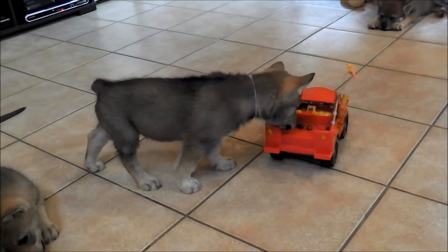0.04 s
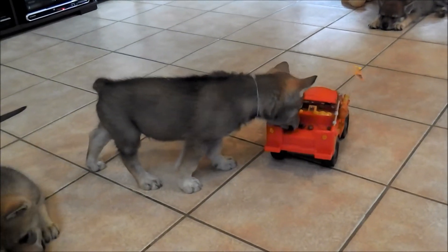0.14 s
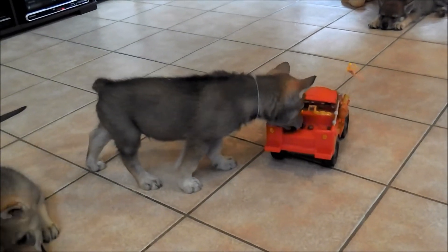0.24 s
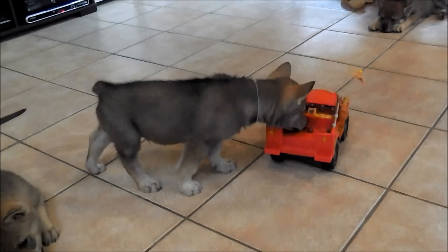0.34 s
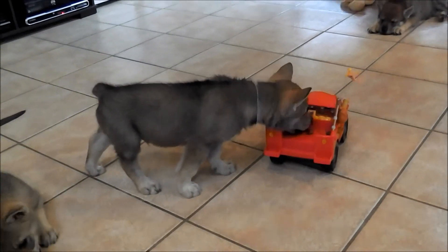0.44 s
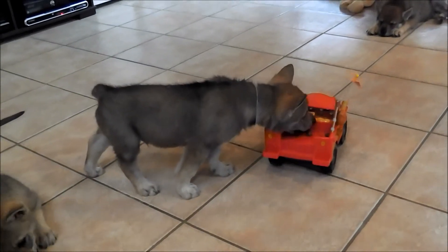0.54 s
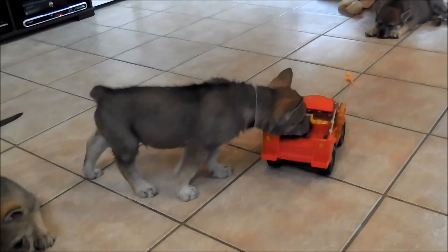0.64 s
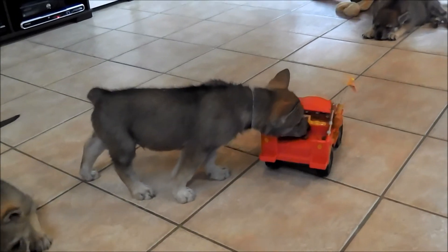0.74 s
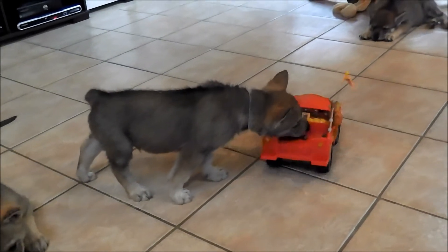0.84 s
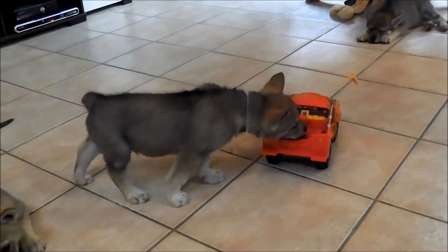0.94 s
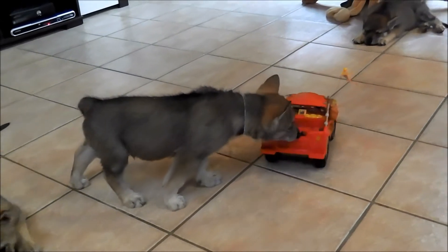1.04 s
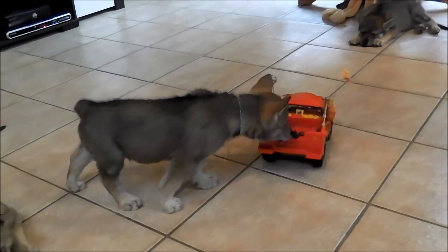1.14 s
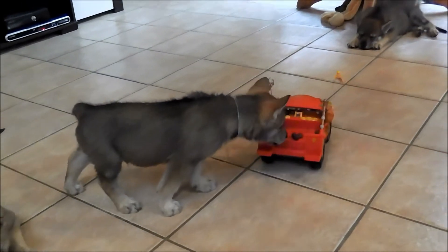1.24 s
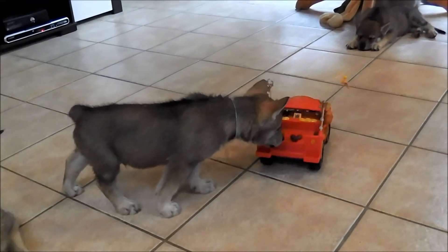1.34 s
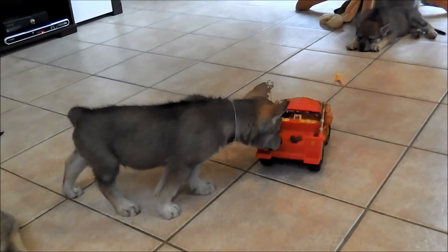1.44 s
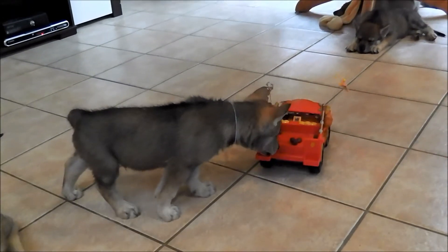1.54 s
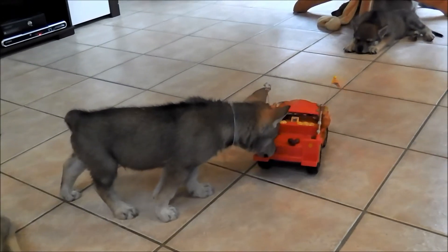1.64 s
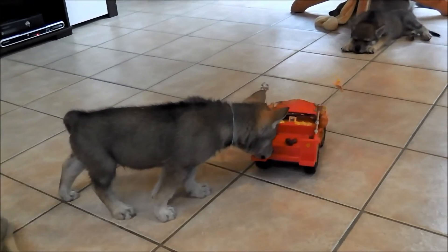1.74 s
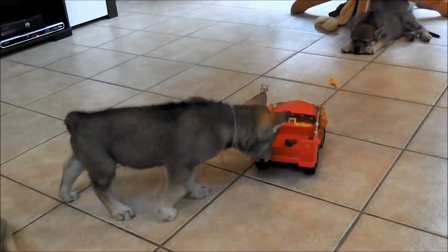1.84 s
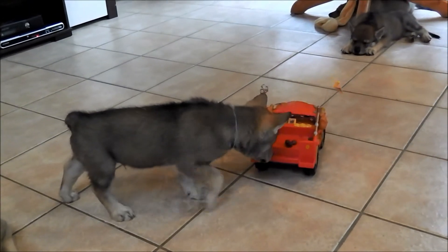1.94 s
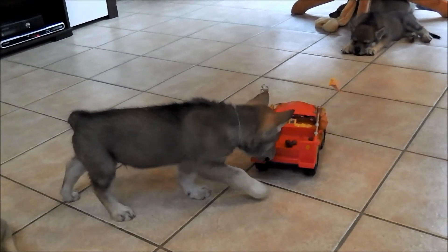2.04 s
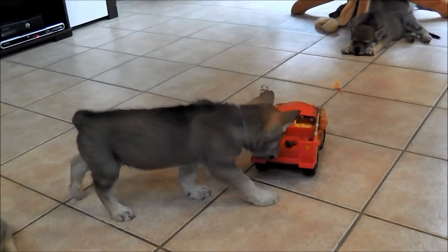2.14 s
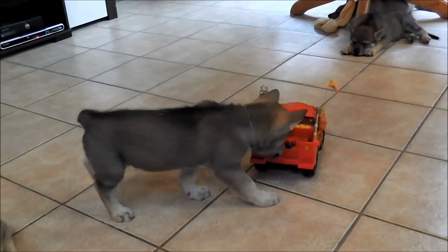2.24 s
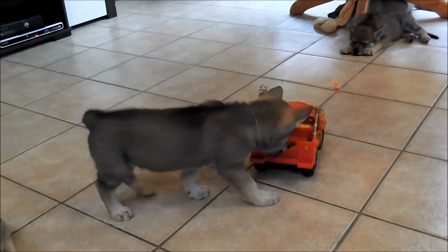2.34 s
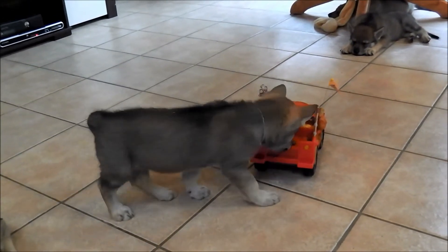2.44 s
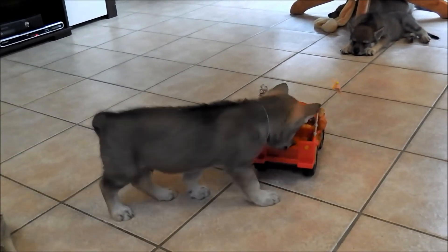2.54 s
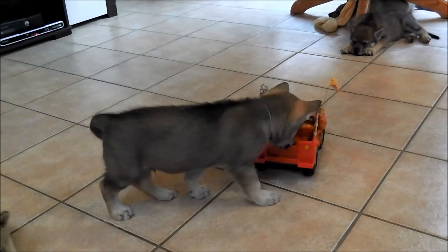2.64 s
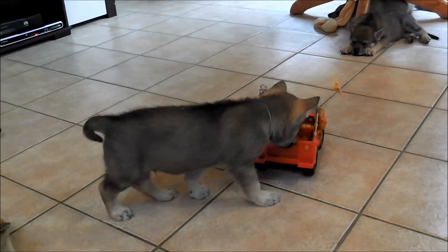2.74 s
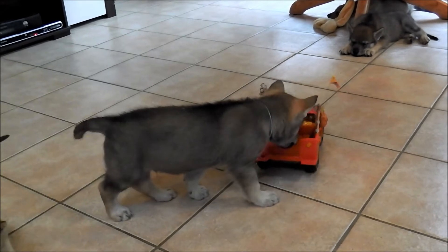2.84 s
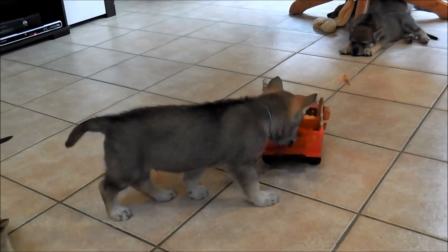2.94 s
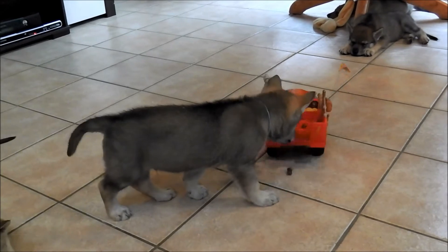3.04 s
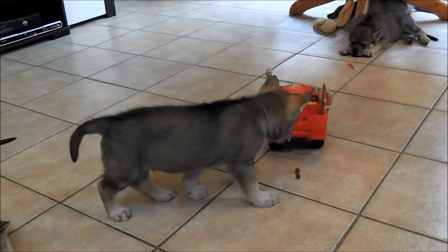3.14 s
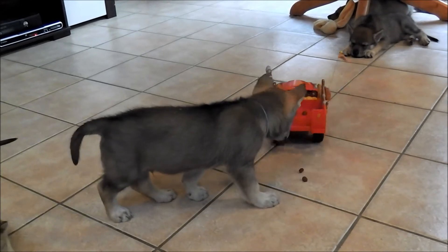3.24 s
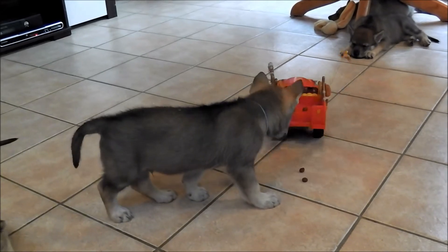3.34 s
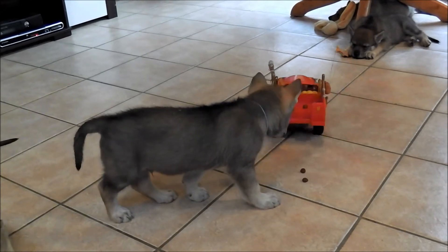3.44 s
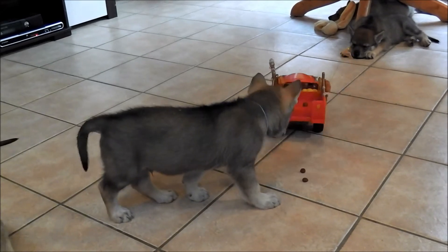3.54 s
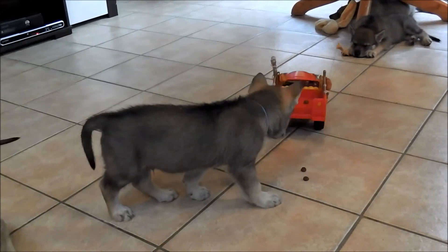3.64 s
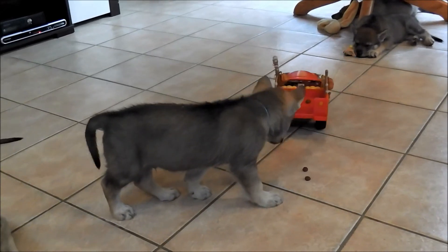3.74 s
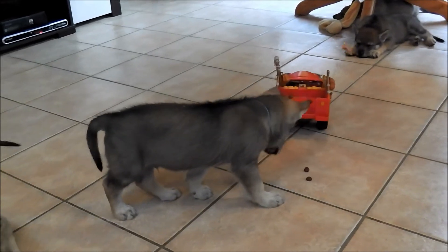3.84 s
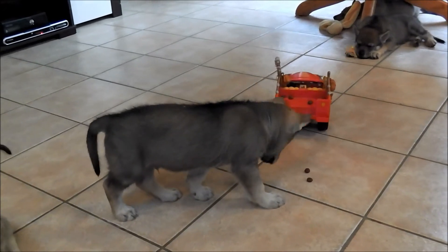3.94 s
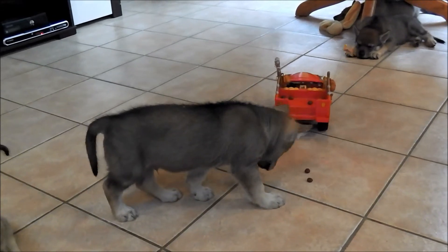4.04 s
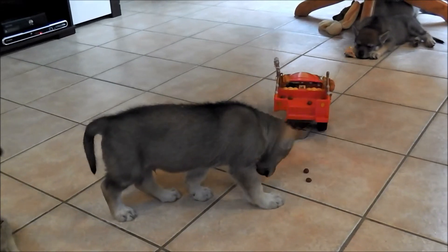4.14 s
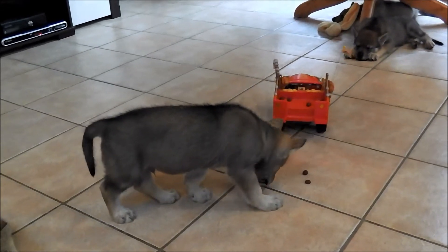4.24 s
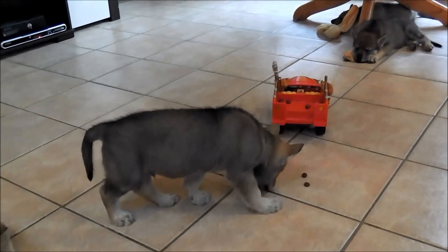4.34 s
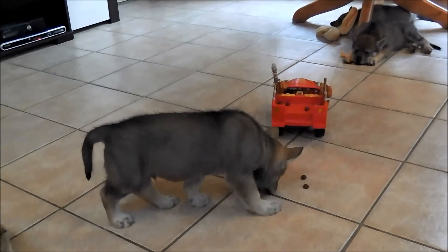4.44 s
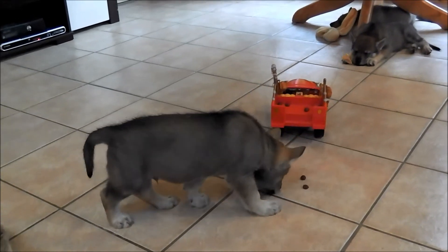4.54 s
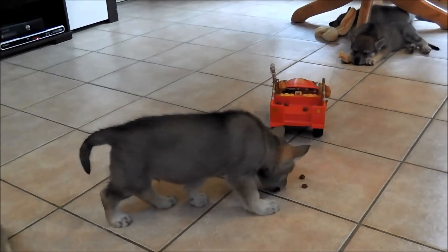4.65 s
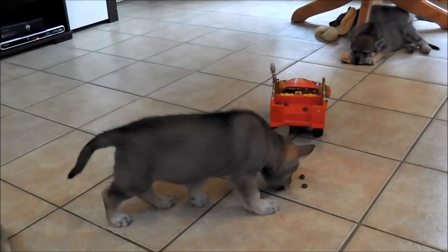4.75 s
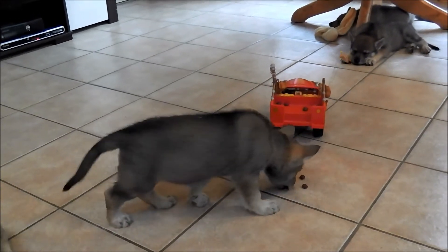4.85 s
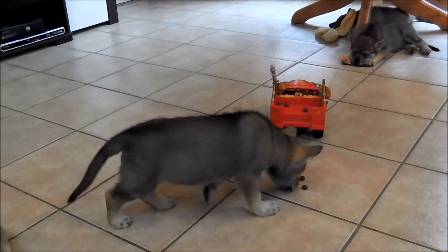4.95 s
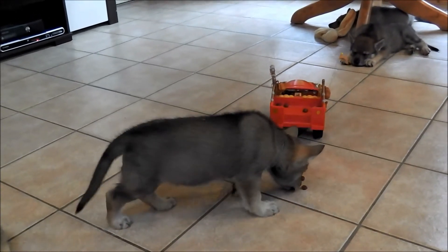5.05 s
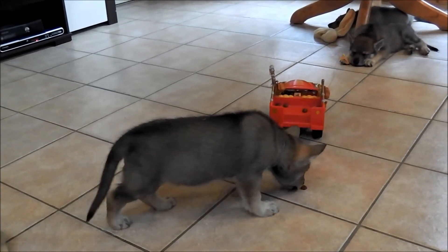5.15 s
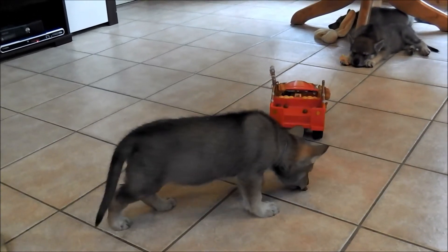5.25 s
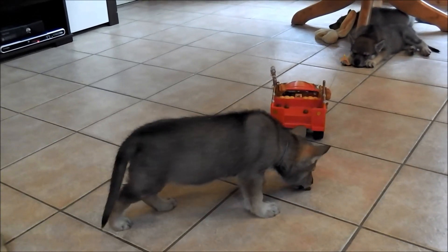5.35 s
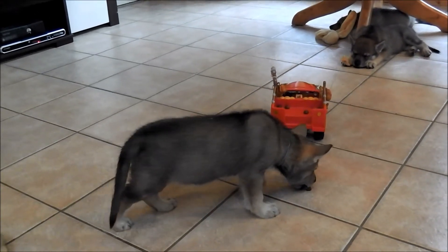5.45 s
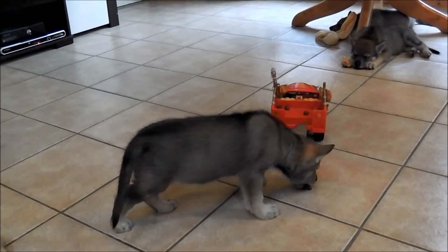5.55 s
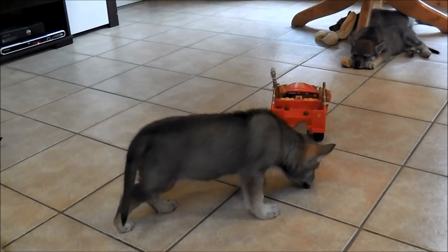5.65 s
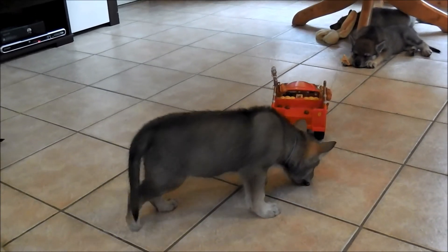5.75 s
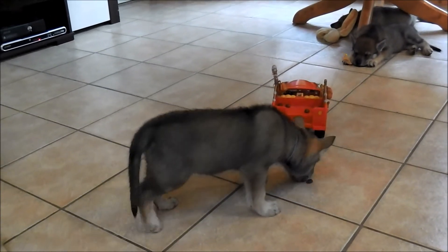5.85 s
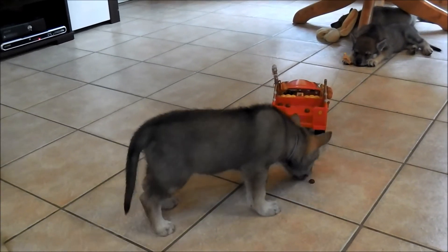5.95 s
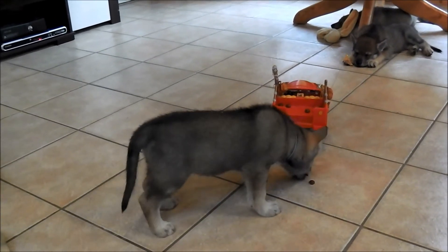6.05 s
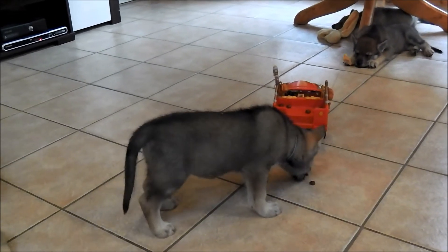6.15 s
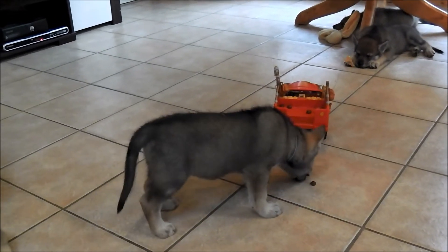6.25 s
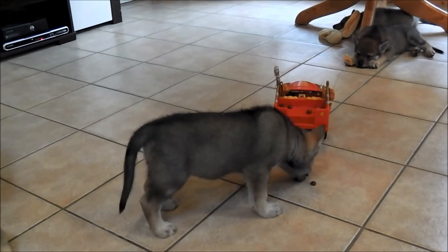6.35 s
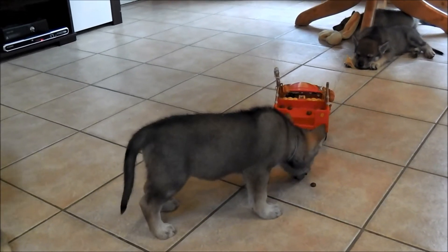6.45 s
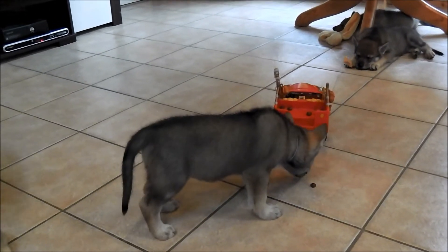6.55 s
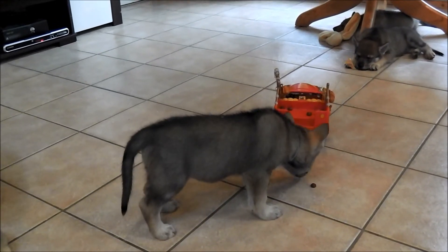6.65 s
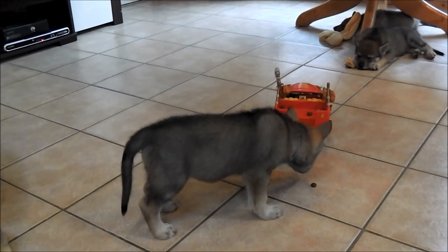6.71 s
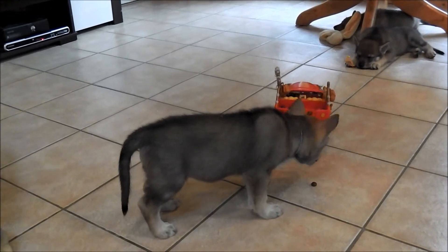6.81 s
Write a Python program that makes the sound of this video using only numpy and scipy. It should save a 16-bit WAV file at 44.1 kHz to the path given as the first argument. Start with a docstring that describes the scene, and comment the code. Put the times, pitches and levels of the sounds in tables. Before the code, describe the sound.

In a hard, lively indoor room, a soft steady hiss lies under everything. From 0 to 0.6 seconds, faint scuffling, light plastic taps and tiny creaks come from a hollow toy truck. A firmer knock at 0.6 leads into a short rattling roll over tiles from about 0.7 to 1.3, with the loudest sharp clack near 0.9 and another at 1.1. Sparse, softer knocks and a small treat crack follow until 2.5. A bright hollow knock at 2.6 starts a second, denser burst of wheel chatter and clacks from 2.7 to 3.3, coasting down into a faint low drone. Small creaks and cracks occur around 3.6 to 4.5. Dry crunches cluster near 5.0 to 5.4, then after a quieter gap return crisply from 6.0 to 6.9, strongest around 6.4 to 6.5, amid faint ticks.

```python
"""A puppy noses a hollow plastic toy truck over the tiles of a hard, fairly live room.
Knocks and creaks ring the truck's shell; twice it rolls off on chattering wheels and coasts to rest.
Treats crack between the puppy's teeth, mostly after the rolling, amid faint scuffling ticks.
Each source is a contact force driving damped resonances; noise echoes give the room.
A soft hiss, separate in the two channels, lies under it all."""
import sys
import numpy as np
from scipy import signal
from scipy.fft import rfft, irfft, next_fast_len
from scipy.io import wavfile

SR = 44100
rng = np.random.default_rng(int(sys.argv[2]) if len(sys.argv) > 2 else 0)


def transcribe(u):
    """Save the signal u as a 16-bit wav file named by the first command-line argument.

    u: samples, shape (n,) or (channels, n), limited to [-1, 1]; the rate is SR.
    q: integer samples, one column per channel.
    """
    v = np.clip(np.atleast_2d(u).T, -1, 1)
    q = np.round(v * 32767).astype(np.int16)
    wavfile.write(sys.argv[1], SR, q)


N = 303408

# Truck and puppy levels are set ahead of the common gain in scene(); the hiss is added after it.
# The low, middle, upper and top registers: from_hz, to_hz
REGISTERS = [(25, 950), (900, 2500), (2500, 6800), (6800, 15500)]
# Damped modes of the truck's body, the lowest a thud on the floor: mode_hz, width_hz, strength_db
BODY = [(40, 88, -11), (119, 79, -15), (395.7, 12.6, -2.5), (583, 127, 3), (717, 120, -10), (1090, 75, -1),
        (1410, 195, -1.5), (1593, 280, 0), (1950, 320, -0.5), (2240, 870, -6.5), (2510, 1350, 7.5),
        (3040, 520, -1), (3860, 700, -5.5), (4570, 1030, 3), (5370, 780, 2), (6200, 770, -10),
        (8400, 3600, 10.5), (11000, 4600, -7)]
# Tones of the truck's small loose parts: tone_hz, width_hz, strength_db
PARTS = [(1423, 23, -3), (1843, 41, -6), (2100, 69, -1.5), (2558, 28, 1.5), (2635, 32, -2.5),
         (2950, 54, -3), (3350, 75, -4), (3890, 65, -4), (4796, 91, -0.5), (5740, 110, -2), (6760, 130, -1),
         (8350, 140, -2)]
CUTOFF_HZ = 15800  # top of the sound
SHOVE_ATTACK_S = 0.016
BRISK_DB = -34.5  # level of a brisk roll


def from_db(db):
    """Decibels to amplitude gain."""
    return 10 ** (np.asarray(db) / 20)


def rms_one(x):
    """Scale to rms 1."""
    return x / np.sqrt(np.mean(x ** 2) + 1e-30)


def at_hz(rows, hz):
    """Read each column of a spectrum at the given frequencies, on a logarithmic pitch axis."""
    row_hz, *columns = np.transpose(rows)
    log_hz = np.log(np.maximum(hz, 1))
    return [np.interp(log_hz, np.log(row_hz), column) for column in columns]


def band(x, edges):
    """Causal band-pass between two edges in Hz."""
    sos = signal.butter(2, edges, "band", fs=SR, output="sos")
    return signal.sosfilt(sos, x + 1e-18)


def resonance(x, hz, width):
    """One damped mode with gain 1 at its peak; the wider it is (Hz), the sooner it dies."""
    r = np.exp(-np.pi * width / SR)
    zeros = np.array([1, 0, -1]) * (1 - r * r) / 2
    poles = [1, -2 * r * np.cos(2 * np.pi * hz / SR), r * r]
    return signal.lfilter(zeros, poles, x + 1e-18)


def ringing(x, modes):
    """Sum of the modes that x sets ringing."""
    return sum(from_db(db) * resonance(x, hz, width) for hz, width, db in modes)


def coloured(x, spectrum, weight=1):
    """Give x a smooth spectrum; weights of opposite sign lean it to one side."""
    size = next_fast_len(N)
    db, = at_hz(spectrum, np.arange(size // 2 + 1) * SR / size)
    return irfft(rfft(x, size) * from_db(db * np.asarray(weight)), size)[..., :N]


def delayed(x, lag_s):
    """Delay by any time, even a fraction of a sample, by turning the phase of each frequency."""
    size = next_fast_len(N)
    hz = np.arange(size // 2 + 1) * SR / size
    return irfft(rfft(x, size) * np.exp(-2j * np.pi * hz * lag_s), size)[:N]


def surge(s, hold_s, db, fade_db_per_s, attack_s):
    """Power of one push: it swells, holds until hold_s after its start, then dies at a steady rate."""
    t = np.arange(N) / SR - s
    swell = np.clip(t / attack_s, 0, 1)
    faded_db = db - fade_db_per_s * np.maximum(t - hold_s, 0)
    return (swell * from_db(np.maximum(faded_db, -120))) ** 2


def register(force, modes, edges, spread_db=0):
    """The modes of one register answer a force; their strengths vary with the point of contact."""
    chance = rng.standard_normal(len(modes))
    answer = sum(from_db(db + spread_db * luck) * resonance(force, hz, width)
                 for (hz, width, db), luck in zip(modes, chance) if edges[0] <= hz < edges[1])
    return band(answer, edges)


def evened(force):
    """Give a contact force equal strength at every pitch, so that the struck object alone colours it."""
    return irfft(np.exp(1j * np.angle(rfft(force))), len(force))


def blows(table, modes, click, spread_db, fade, focus_db, thud_hz):
    """Each blow is a click and a short gritty slip, heard as a ring and a low thud."""
    grip_s = 0.00052  # time for the contact to build up
    slip_taper = 0.18  # share of the contact's release that also damps its last grit
    softest_db = 23.5  # softness (dB per octave) against which the low edge of a ring is set
    top_loss_db = 19.5  # a ring ends steeply where its softness has cost it this much
    t = np.arange(SR // 20) / SR
    out = np.zeros(N + len(t))
    hz, width, mode_db = np.transpose(modes)
    grip = 1 - np.exp(-t / grip_s)
    for s, db, spot_hz, soft_db, thud_db, contact_ms in table:
        release = np.exp(-fade * 1000 * t / contact_ms)
        slip = grip * release * rng.standard_normal(len(t))
        force = evened(click * (t == 0) + slip) * release ** slip_taper
        # modes near the pitch of the struck spot answer best; those above lose soft_db per octave
        octaves = np.log2(hz / spot_hz)
        loss_db = focus_db * np.minimum(abs(octaves), .5) + soft_db * np.maximum(octaves, 0)
        struck = list(zip(hz, width, mode_db - loss_db))
        ring = sum(register(force, struck, edges, spread_db) for edges in REGISTERS[1:])
        # a soft touch stirs little but its own spot, so the ring thins out on both sides of that pitch
        low_hz = spot_hz * np.clip(soft_db / softest_db, .1, .85)
        high_hz = min(spot_hz * 2 ** (top_loss_db / max(soft_db, 2)), CUTOFF_HZ)
        ring = signal.sosfilt(signal.butter(3, [low_hz, high_hz], "band", fs=SR, output="sos"), ring)
        thud = register(force, modes, (thud_hz, REGISTERS[0][1]), spread_db)
        blow = rms_one(ring) + from_db(thud_db) * rms_one(thud)
        at = max(round(s * SR), 0)
        # the root of 10 refers the level of the 50 ms ring to 5 ms
        out[at:at + len(t)] += from_db(db) * blow / np.sqrt(10)
    return out[:N]


def chatter(shares_db, level_db, per_s, uneven_db, reach):
    """Many tiny contacts each reach only some of the body's modes, so each has its own pitch."""
    lightest_hz = 80  # light contacts stir no mode below this
    at = np.flatnonzero(rng.random(N) < per_s / SR)
    sizes = from_db(uneven_db * np.minimum(rng.exponential(1, N), 4))
    sizes = sizes * rng.choice([-1, 1], N) / np.sqrt(per_s)
    out = 0
    for edges, share_db in zip(REGISTERS, shares_db):
        rings = 0
        for hz, width, db in BODY:
            if max(edges[0], lightest_hz) <= hz < edges[1]:
                force = np.zeros(N)
                force[at] = sizes[at] * (rng.random(N)[at] < reach)
                rings = rings + from_db(db) * resonance(force, hz, width)
        out = out + from_db(share_db) * rms_one(band(rings, edges))
    return from_db(level_db) * out


def hiss(low_cut_hz=55):
    """The quiet room: steady coloured noise, unrelated in the two channels, its rumble on the left."""
    # spectrum of the hiss: pitch_hz, relative density_db per Hz
    hiss_spectrum = [(35, -44), (60, -15), (231, -12), (360, 1), (497, -1), (559, -4.5), (849, -7.5),
                     (1170, -10), (1290, -7.5), (2200, -9.5), (2470, -12), (3050, -10.5), (6870, -15),
                     (9300, -15), (9900, -22.5), (15500, -27)]
    # its lean to one side: pitch_hz, left_re_right_db
    hiss_lean = [(100, 26), (220, 6.5), (380, -3), (1300, -1.5), (8000, 1)]
    noise = coloured(rng.standard_normal((2, N)), hiss_spectrum)
    noise = coloured(noise, hiss_lean, [[.5], [-.5]])
    noise = signal.sosfilt(signal.butter(2, low_cut_hz, "high", fs=SR, output="sos"), noise)
    return from_db(-57) * noise / np.std(noise.mean(axis=0))


def room(x, first_echo_s=.006):
    """Dense early echoes off floor and furniture, then a tail that dies sooner in the treble."""
    # the room's ring: pitch_hz, t60_s, level_db, side_re_mid_db
    room_ring = [(60, 0.39, -17, 16), (395, 0.93, -0.5, -8.5), (1500, 0.97, -1.5, -16.5),
                 (3500, 1, -1, -6.5), (6900, 0.58, -3.5, 5), (13800, 0.4, 2, 4)]
    wet_db, early_db = -2.5, 3
    early_t60_s = 0.14  # extra decay of the early echoes, on top of the tail's
    t = np.arange(SR) / SR
    edges = np.geomspace(40, 17000, 10)
    swell = (t > first_echo_s) * (1 + from_db(early_db - 60 * t / early_t60_s))
    response = 0
    for low, high in zip(edges, edges[1:]):
        t60, db, side_db = at_hz(room_ring, np.sqrt(low * high))
        mid, side = band(rng.standard_normal((2, SR)), [low, high])
        stereo = mid + from_db(side_db) * side * [[1], [-1]]
        response = response + from_db(db - 60 * t / t60) * swell * stereo
    response = response / np.sqrt(np.sum(response ** 2) / 2)
    return from_db(wet_db) * signal.fftconvolve(x[None], response, axes=1)[:, :N]


def scuffle():
    """Loose ticks from plastic, muzzle and claws come in bouts, with fainter fidgeting between them."""
    # bouts of ticks: start_s, hold_s, level_db
    bouts = [(0, 0.4, -58.5), (1.373, 0.28, -68), (2.468, 0.094, -54.5), (3.47, 0.28, -56.5),
             (3.922, 0.16, -61), (4.99, 0.19, -66), (5.5, 0.12, -58.5), (5.786, 0.23, -63)]
    # share of each register: share_db
    tick_shares = [-8, -0.5, -3, -13]
    attack_s, fade_db_per_s, fidget_db = 0.034, 95, -69
    power = from_db(fidget_db) ** 2 + sum(surge(*bout, fade_db_per_s, attack_s) for bout in bouts)
    return chatter(tick_shares, 10 * np.log10(power), per_s=1100, uneven_db=2.0, reach=.13)


def puppy():
    """Treats crack between the teeth, ringing the jaws, amid bouts of faint scuffle."""
    # teeth and treats: start_s, ring_level_db (rms over 5 ms), crack_pitch_hz,
    # softness_db lost per octave above it, thud_re_ring_db, contact_ms (nominal; fade scales the release)
    bites = [(1.6982, -38.5, 1480, 17, -4.5, 0.91), (3.8369, -40.5, 1600, 17, 0.5, 0.36),
             (3.8371, -45, 4500, 21, -15, 0.48), (3.8486, -46.5, 1600, 16, 0.5, 0.26),
             (3.8489, -46, 4500, 28, -15, 0.82), (3.948, -48, 4260, 18, -21, 1.7),
             (4.1104, -52, 4980, -1, -24, 1.1), (4.354, -52, 2940, 12, -26, 1.1),
             (5.0225, -51, 5300, 12, -27, 0.71), (5.0355, -51, 2950, 19, -25, 2.8),
             (5.072, -48, 4400, -3, -19, 1), (4.5025, -49, 5870, 20, -8, 2.2),
             (5.112, -44, 1250, 7, -8.5, 1.7), (5.1194, -41, 1330, 15, -14, 3),
             (5.121, -43, 2200, 13, -16, 3.2), (5.1595, -49.5, 2800, 5, -15, 0.55),
             (5.7229, -49.5, 1740, 7, -22, 1.6), (5.1681, -48, 2900, 3, -26, 0.87),
             (5.399, -49, 2500, -9, -17, 2.4), (5.4055, -39.5, 1950, 4.5, -10.5, 1.1),
             (6.03, -59, 1600, 12, 8, 6.7), (6.0732, -46.5, 1430, 30, -8, 1.2),
             (6.124, -48, 2700, 23, -21, 0.64), (6.2952, -51.5, 1850, 22, -4, 2),
             (6.341, -43, 1700, 20, -17, 2.3), (6.3478, -48, 1740, 27, -21, 1.2),
             (6.3978, -37, 5350, 16, -39, 0.79), (6.4806, -43, 3900, 1, -31, 1.4),
             (6.4855, -46, 6000, 4, -28, 3), (6.4904, -36, 4940, 17, -44, 0.9),
             (6.5594, -43, 1650, 39, -19, 0.54), (6.6051, -48, 1720, 19, -23, 1.4),
             (6.8522, -44.5, 1500, 44, -5.5, 0.65)]
    # resonances of a treat in the jaws: mode_hz, width_hz, strength_db
    jaws = [(350, 51, 10), (443, 84, -5), (1380, 160, -8), (1650, 190, 2.5), (2200, 210, -4),
            (2910, 700, 1), (4280, 900, 2), (5100, 460, -3), (6530, 1600, 11.5), (8240, 1500, -4),
            (11000, 5100, -1)]
    cracks = blows(bites, jaws, click=1.73, spread_db=4.0, fade=0.72, focus_db=10.0, thud_hz=303)
    return scuffle() + cracks


def creaks():
    """Loose parts stick and slip: quick uneven slips swell and fade, ringing most the parts near one pitch."""
    # creaks: start_s, length_s, level_db, pitch_hz, focus_db lost per octave away from it
    creak_table = [(0.096, 0.04, -42.5, 1660, 8), (0.367, 0.027, -46, 2860, 4),
                   (1.334, 0.012, -47, 3180, 1), (1.615, 0.034, -51.5, 5000, 0),
                   (3.571, 0.054, -52.5, 5270, -4), (3.748, 0.075, -58.5, 4830, 15),
                   (3.995, 0.019, -51, 3960, 8)]
    slips_per_s = 1300
    size = SR // 4
    out = np.zeros(N + size)
    for s, length, db, pitch_hz, focus_db in creak_table:
        swell = np.sin(np.pi * np.minimum(np.arange(size) / SR / length, 1))
        slips = swell * (rng.random(size) < slips_per_s / SR) * rng.standard_normal(size)
        ring = 0
        for hz, width, part_db in PARTS:
            heard_db = part_db - focus_db * abs(np.log2(hz / pitch_hz))
            ring = ring + from_db(heard_db) * rms_one(resonance(slips, hz, width))
        at = round(s * SR)
        # the level is the rms over the creak's own length
        out[at:at + size] += from_db(db) * rms_one(ring) * np.sqrt(length * SR / size)
    return out[:N]


def rattle(level_db, uneven_db=2.0):
    """Shaken by the roll, each loose part ticks at its own moments and rings briefly."""
    ticks_per_s = 30  # of each part
    rattle_db = -9  # relative to a brisk roll
    follows = 1  # share of the roll's change in level that the rattle follows
    strength = from_db(BRISK_DB + rattle_db + follows * (level_db - BRISK_DB))
    out = 0
    for hz, width, db in PARTS:
        at = np.flatnonzero(rng.random(N) < ticks_per_s / SR)
        ticks = np.zeros(N)
        ticks[at] = strength[at] * from_db(uneven_db * rng.uniform(-1.5, 1, N)[at])
        # even out the loudness for the ring's width and the number of ticks
        evening = SR / np.sqrt(np.pi * width * ticks_per_s * len(PARTS))
        out = out + from_db(db) * resonance(ticks, hz, width) * evening
    return out


def wheels():
    """Shoves set wheels chattering and parts rattling; contacts grow fainter and fewer as the truck slows."""
    # the muzzle shoves the truck, which then coasts: start_s, hold_s, level_db, slowing_db_per_s
    shoves = [(0.731, 0.23, -38.5, 165), (0.925, 0.048, -32, 152), (1.198, 0.036, -47, 73),
              (2.739, 0.053, -42.5, 101), (2.768, 0.33, -35.5, 199), (2.864, 0.033, -35.5, 250),
              (2.968, 0.034, -34.5, 195), (3.038, 0.019, -32, 128), (3.101, 0.17, -38.5, 44.5)]
    # share of each register: share_db
    roll_shares = [-12.5, -1.5, -4, -16.5]
    brisk_contacts_per_s = 4200
    rate_follows = 0.6  # how closely the contact rate follows the level
    judder_db, judder_hz = 1, (11.4, 68)  # uneven running: rms depth, and band of its rates
    power = sum(surge(*shove, SHOVE_ATTACK_S) for shove in shoves)
    level_db = 10 * np.log10(power + 1e-12)
    per_s = brisk_contacts_per_s * from_db(rate_follows * np.maximum(level_db - BRISK_DB, -20))
    level_db = level_db + judder_db * rms_one(band(rng.standard_normal(N), judder_hz))
    return chatter(roll_shares, level_db, per_s, uneven_db=0.0, reach=.18) + rattle(level_db)


def rumble():
    """The grain of the tiles, as noise, keeps the hollow wheels droning while the truck runs free."""
    # the long coast: start_s, hold_s (negative: fading already before the start), level_db, fading_db_per_s
    coast = (3.5, -0.13, -60, 22)
    wheel_hz, wheel_width_hz = 374, 110
    drone = resonance(rng.standard_normal(N), wheel_hz, wheel_width_hz)
    drone = resonance(drone, wheel_hz, wheel_width_hz)
    return np.sqrt(surge(*coast, SHOVE_ATTACK_S)) * rms_one(drone)


def truck():
    """All the body's sounds ring its thin panels; knocks also ring its hollow and jolt the loose parts."""
    # blows on the truck: start_s, ring_level_db (rms over 5 ms), spot_pitch_hz,
    # softness_db lost per octave above it, thud_re_ring_db, contact_ms (nominal; fade scales the release)
    knock_table = [(0.0194, -41.5, 3040, 14.5, -19, 2.4), (0.1028, -39, 5700, 18, -32, 3.1),
                   (0.1137, -43, 5550, 16, -30, 3.5), (0.2703, -43.5, 2970, 25, -32, 2.2),
                   (0.303, -48, 1310, 34, -27, 2.7), (0.6235, -33.5, 1400, 5.5, -7.5, 0.75),
                   (0.7174, -38, 5770, 2, -15, 3.9), (0.7368, -27, 2090, 9.5, -16, 12),
                   (0.8305, -34, 1440, 17, -7, 3.6), (0.8925, -31, 3300, 16, -9, 4.6),
                   (0.915, -35, 4000, 4, -5, 3.4), (0.9254, -18, 2150, 5, -13.5, 1.66),
                   (0.9337, -31, 1120, 11, -16, 2.8), (0.9505, -27.5, 1100, 3, -9, 2),
                   (0.9664, -29.5, 1090, 43, -8, 6.8), (1.0059, -28.5, 2030, 23, -14, 1.6),
                   (1.0662, -28.5, 5720, 12, -32, 2.2), (1.1025, -34, 5800, 5, -23, 0.84),
                   (1.1108, -22, 3240, 2, -33, 2.7), (1.179, -38.5, 1720, 10, -24, 3.8),
                   (1.2072, -33.5, 2050, 10.5, -16, 4.4), (1.275, -37.5, 1980, 9, -18, 3.8),
                   (1.3835, -41, 3320, 41, -27, 2.1), (1.3847, -33.5, 1750, 12, -16.5, 1.7),
                   (1.3964, -41.5, 1420, 7, -11, 1.5), (1.4793, -46, 2680, 42, -37, 1.6),
                   (1.517, -45, 1600, 26, -13, 1.5), (1.6709, -46.5, 5300, 12, -33, 0.57),
                   (1.7922, -41.5, 1770, 6, -11, 0.96), (1.8139, -38.5, 1670, 17.5, -6.5, 1.7),
                   (2.0433, -49.5, 3830, 32, -16, 0.5), (2.2669, -33.5, 1600, 18, -9.5, 0.78),
                   (2.269, -43.5, 5050, 6, -20, 0.9), (2.5536, -44.5, 1590, 8.5, -8.5, 4.2),
                   (2.6227, -34.5, 1430, 4, -6, 0.68), (2.6353, -40.5, 5500, 7, -8, 0.36),
                   (2.635, -25, 1500, 14.5, -9, 1), (2.7368, -34.5, 1440, 5.5, -15, 2.9),
                   (2.7972, -37, 1620, 2, -22, 2.5), (2.8556, -34, 11000, -3, -26, 1.5),
                   (2.8756, -32.5, 1500, 5, -17, 4.1), (2.8985, -28, 1910, 19, -11, 3.2),
                   (2.9245, -38.5, 1440, 19, -1, 2.1), (2.96, -24.5, 1510, 16, -10.5, 0.7),
                   (2.9899, -29.5, 2240, 11, -22, 2), (3.053, -26.5, 1950, 7.5, -19, 4.8),
                   (3.0735, -33, 1950, 17, -6, 1.2), (3.0922, -28.5, 3720, 3, 0.5, 0.99),
                   (3.1075, -27, 4200, 13, -7, 22), (3.2088, -31, 2780, 16, -15, 11),
                   (3.2507, -32.5, 5055, -3, -16, 5.7), (3.3684, -39, 2470, 39, -27, 1.6),
                   (3.4824, -49, 5100, 8, -23, 1.8), (3.5219, -48, 1820, 21, -26, 1.8),
                   (3.592, -49, 1800, 13, -9, 1.8), (3.635, -51, 2900, 11, -19, 1.8)]
    # thin panels that ring on: mode_hz, width_hz, strength_db (ahead of panels_db)
    panels = [(584, 5.4, 1), (1035, 8.1, 3), (1165, 12, -6), (1190, 39, 3.5), (1370, 17, -7),
              (1480, 9.2, -12), (1650, 6.4, -7), (2000, 16, -11)]
    # the hollow, which only a knock sets ringing: mode_hz, width_hz, strength_db
    hollow = [(1480, 7.9, -0.5), (1545, 6, 2), (1600, 6.6, 0)]
    panels_db, jolt_db = -5.5, -2  # how strongly the body rings its panels, and a knock the loose parts
    knocks = blows(knock_table, BODY, click=3.3, spread_db=2.5, fade=0.35, focus_db=31.5, thud_hz=30)
    body = wheels() + rumble() + knocks + creaks()
    panel_ring = from_db(panels_db) * ringing(body, panels)
    jolted_parts = from_db(jolt_db) * ringing(knocks, PARTS)
    return body + panel_ring + jolted_parts + ringing(knocks, hollow)


def scene(stride_hz=0.8015):
    """Truck and puppy, mostly a little to the right; as they move, two echo patterns trade places."""
    # where the truck stands: pitch_hz, left_re_right_db
    place = [(110, 1), (220, -1.5), (400, -5), (800, -6), (4400, -4.5), (8000, -2.5), (15000, 2.5)]
    puppy_left_db = 0.5  # the puppy's direct sound stands this much left of the truck
    right_lag_s = 2.4e-5  # the right microphone hears truck, puppy and echoes this much later
    toy, dog = truck(), puppy()
    turn = 2 * np.pi * stride_hz * np.arange(N) / SR
    echoes = room((toy + dog) * np.cos(turn)) + room((toy + dog) * np.sin(turn))
    direct = toy + dog * from_db(puppy_left_db * np.array([[.5], [-.5]]))
    left, right = coloured(direct + echoes, place, [[.5], [-.5]])
    return from_db(-1.06) * np.array([left, delayed(right, right_lag_s)]) + hiss()


def record(dry):
    """A steep low-pass cuts off the top."""
    return signal.sosfilt(signal.ellip(10, .1, 80, CUTOFF_HZ, fs=SR, output="sos"), dry)


dry = scene()
out = record(dry)
transcribe(out)
```